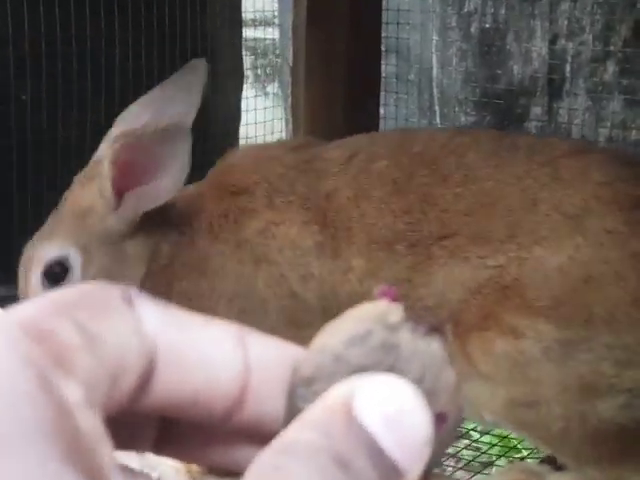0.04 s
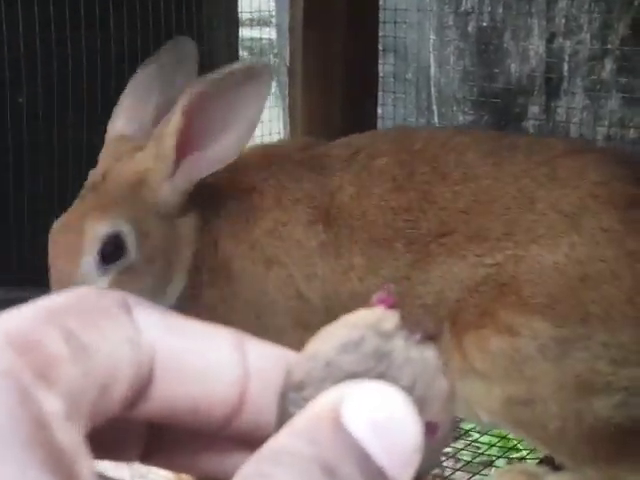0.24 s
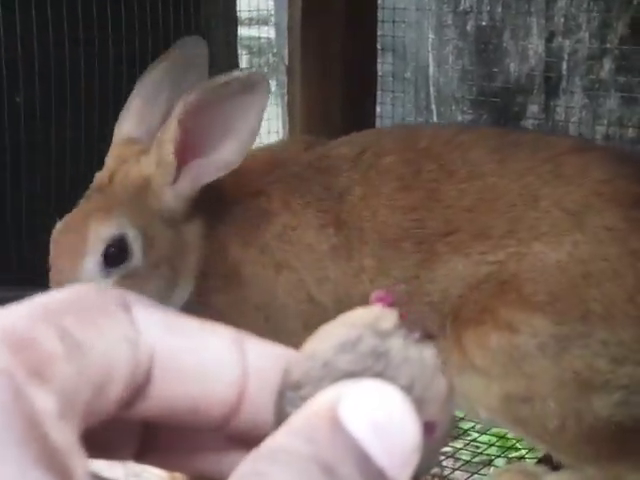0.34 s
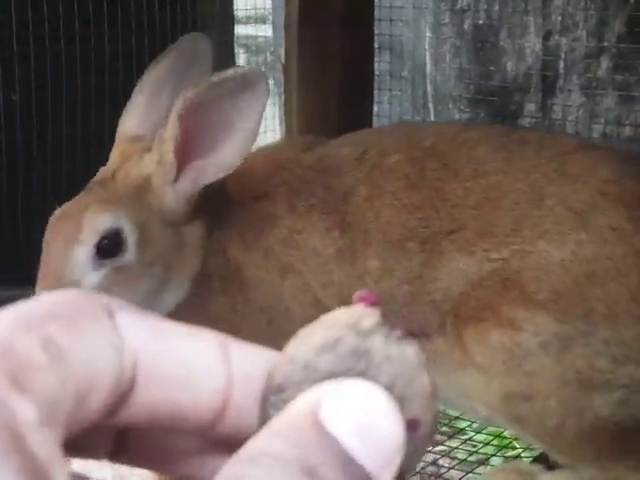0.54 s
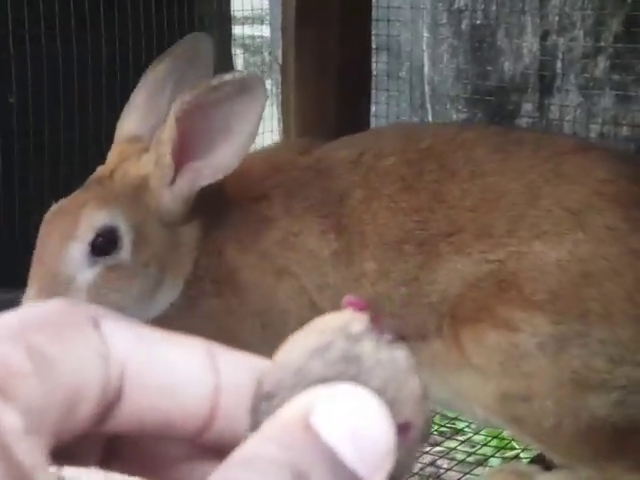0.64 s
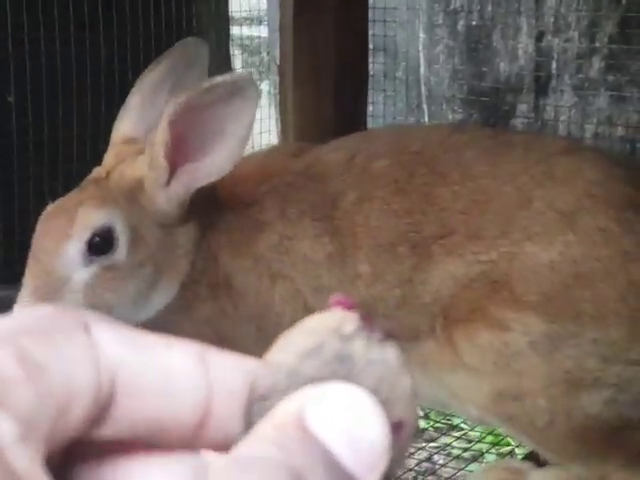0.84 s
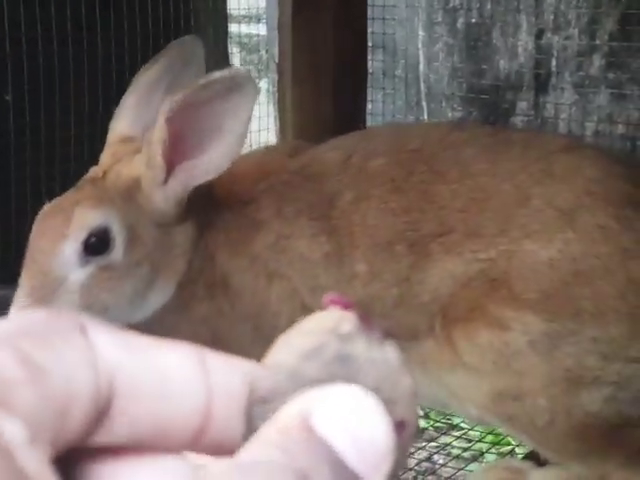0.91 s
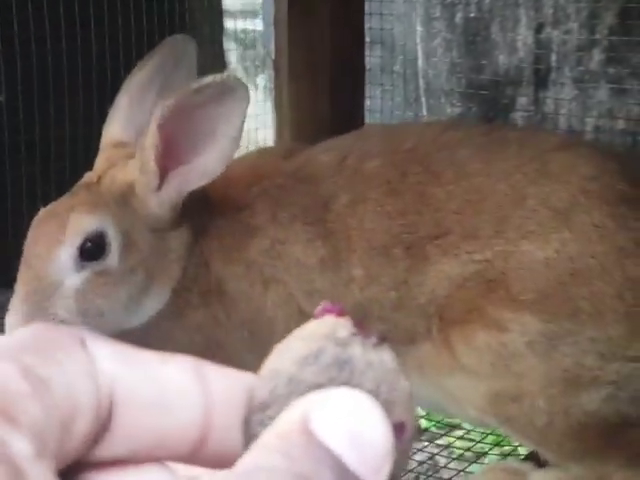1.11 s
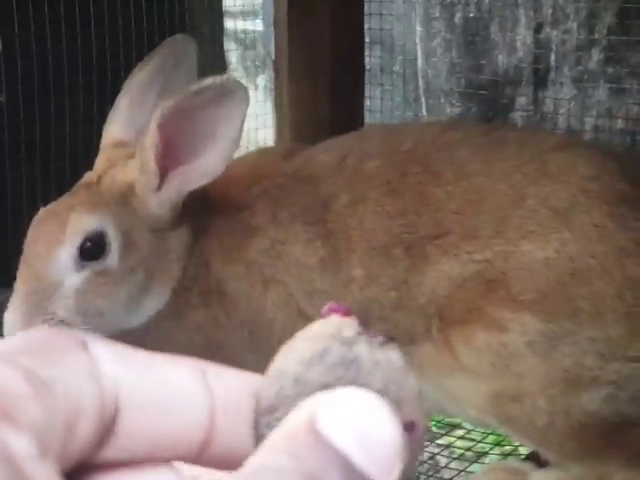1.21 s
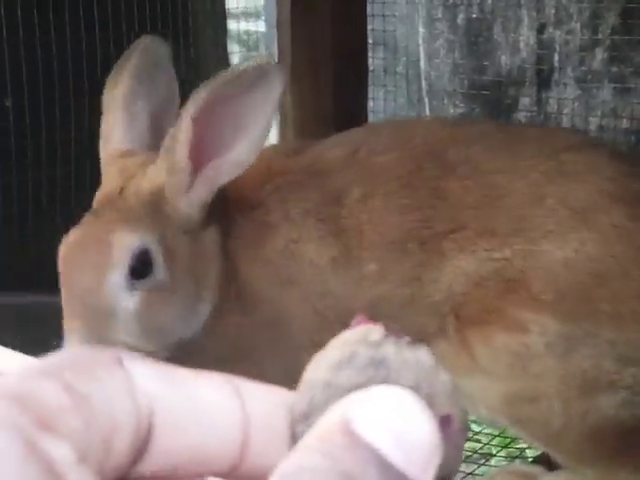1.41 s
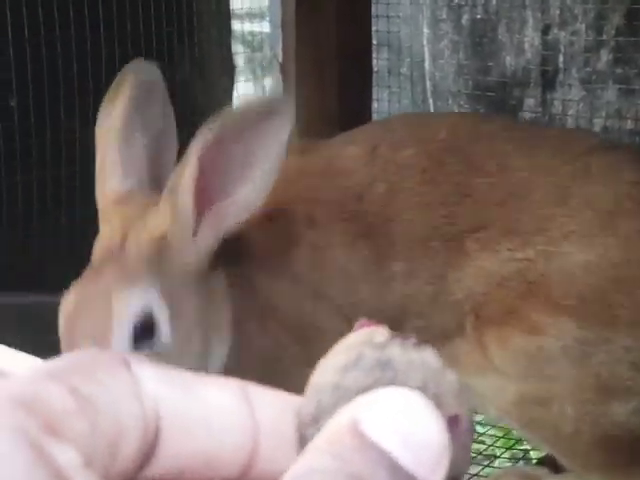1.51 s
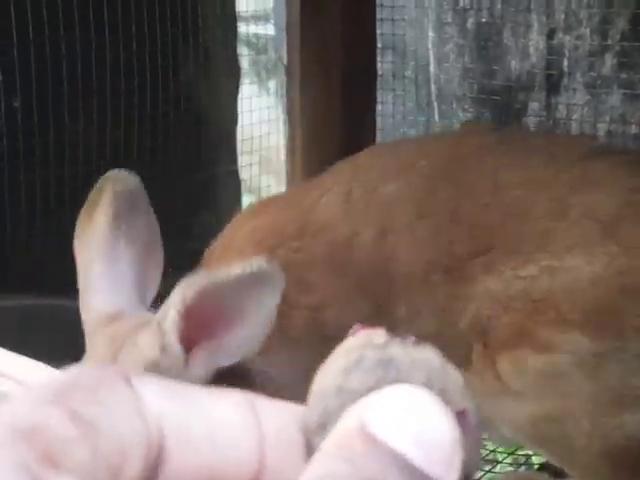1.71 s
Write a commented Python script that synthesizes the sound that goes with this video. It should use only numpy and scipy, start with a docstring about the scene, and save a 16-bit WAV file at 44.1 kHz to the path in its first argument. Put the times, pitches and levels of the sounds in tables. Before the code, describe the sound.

Close to the microphone, a person makes seven quick, squeaky lip kisses, as if calling a rabbit. Each slides in pitch, some rasp, and a faint one trails after. A quiet outdoor rumble and hum lie behind.

```python
"""At a wooden hutch outdoors, close beside a rabbit: seven short, wet, kiss-like squeaks and two faint ones.
Each is a pulse train: a moist opening flutters, and its tiny pops excite one set of resonances.
Slow pops are heard as ticks, fast ones as a tone that glides with the pop rate, turns raspy when
squeezed and dulls as it ends. A brief thin tone rings in each faint squeak, and a faint high pip follows.
The boards reflect the sound, and behind it lie a low rumble, a faint hum and a soft wash of noise."""
import sys
import numpy as np
from scipy import signal
from scipy.fft import rfft, irfft, next_fast_len
from scipy.io import wavfile
from scipy.ndimage import map_coordinates

SR = 44100
rng = np.random.default_rng(int(sys.argv[2]) if len(sys.argv) > 2 else 0)


def dump(signal):
    """Clip the signal to [-1, 1] and save it as 16-bit WAV at the path in sys.argv[1]."""
    limited = np.clip(np.atleast_2d(signal).T, -1, 1)
    pcm = np.round(limited * 32767).astype(np.int16)
    wavfile.write(sys.argv[1], SR, pcm)


N = 77175
TOP_HZ = 16300

# Course of the flutter in each loud squeak: time_s, pop_rate_hz, roughness (0-1), tone_db, sizzle_db
SQUEAK_1 = [(0.2355, 915, 0.1, -37, -43), (0.24, 1008, 0.2, -30.5, -29.5), (0.249, 1171, 0.01, -34.5, -35),
            (0.254, 1191, 0.4, -30.5, -27.5), (0.259, 1439, 0.8, -27, -29),
            (0.266, 1325, 0.97, -30.5, -26.5), (0.274, 1172, 0.57, -30, -30.5),
            (0.282, 1178, 0.8, -34.5, -24), (0.29, 1008, 0.7, -28, -31.5), (0.308, 912, 0.85, -36, -35),
            (0.318, 1010, 0.68, -35, -38.5), (0.335, 950, 0.8, -56, -51)]
SQUEAK_2 = [(0.4653, 369, 0.083, -43.5, -29), (0.469, 456.5, 0.14, -44.5, -24.5),
            (0.48, 604, 0.33, -36, -29.5), (0.492, 715, 0.13, -34.5, -32), (0.504, 861, 0.11, -37, -43),
            (0.514, 799, 0.1, -45.5, -45.5), (0.522, 770, 0.1, -38, -50.5),
            (0.534, 774, 0.057, -40.5, -54.5), (0.547, 810, 0.3, -42, -48.5),
            (0.561, 931, 0.47, -45, -52.5), (0.575, 950.0, 0.51, -52, -47.5)]
SQUEAK_3 = [(0.643, 595, 0.05, -62.5, -80), (0.66, 698.9, 0.05, -45.5, -63),
            (0.68, 896, 0.05, -43.5, -45.5), (0.692, 950, 0.3, -39, -39), (0.694, 729.5, 0.42, -37, -33.5),
            (0.709, 779, 0.15, -38, -28.5), (0.72, 846, 0.4, -38.5, -23), (0.731, 957, 0.3, -30, -28.5),
            (0.735, 1194, 0.1, -31.5, -26.5), (0.743, 1165, 0.15, -30.5, -30),
            (0.76, 963, 0.22, -32.5, -41.5), (0.776, 791, 0.24, -42.5, -52), (0.794, 666, 0.4, -54, -79)]
SQUEAK_4 = [(0.891, 276, 0.16, -41, -30), (0.901, 416, 0.18, -37, -29.5), (0.908, 527, 0.41, -34.5, -35),
            (0.913, 719, 0.82, -36.5, -28), (0.923, 624.3, 0.17, -34.5, -32),
            (0.928, 601, 0.05, -32.5, -32), (0.933, 616, 0.14, -34, -34), (0.94, 786, 0.2, -40, -47),
            (0.946, 734, 0.18, -35, -59), (0.957, 615, 0.2, -54.5, -61)]
SQUEAK_5 = [(1.0837, 345, 0.1, -40, -28.5), (1.09, 518, 0.61, -35, -31.5), (1.096, 693, 0.24, -38, -35),
            (1.101, 681, 0.075, -31.5, -29), (1.111, 774, 0.2, -35, -36.5), (1.119, 760, 0.12, -39.5, -49),
            (1.128, 678, 0.1, -34.5, -49), (1.138, 524, 0.26, -53, -55.5)]
SQUEAK_6 = [(1.2642, 518.3, 0.1, -34.5, -28.5), (1.2668, 700, .2, -40.5, -36),
            (1.269, 1372, .08, -34.5, -33), (1.274, 1159, .08, -35, -43), (1.278, 852, 0.54, -31.5, -35),
            (1.292, 847, 0.25, -33.5, -34), (1.305, 764, 0.044, -33.5, -44), (1.316, 700, .07, -34, -45.5),
            (1.331, 608, 0.078, -39.5, -58), (1.339, 580, 0.1, -53, -69.5)]
SQUEAK_7 = [(1.4572, 796, 0.15, -39, -32.5), (1.462, 1272, 0.1, -34, -38), (1.468, 1202, .05, -33, -41),
            (1.478, 970, 0.32, -31, -34.5), (1.488, 938.4, 0.061, -28, -34),
            (1.508, 866, 0.108, -32.5, -34), (1.521, 781, 0.103, -37, -41),
            (1.534, 746.5, 0.05, -35, -49.5), (1.549, 729.4, 0.05, -42.5, -61), (1.564, 733, .05, -62, -70)]
LOUD_SQUEAKS = (SQUEAK_1, SQUEAK_2, SQUEAK_3, SQUEAK_4, SQUEAK_5, SQUEAK_6, SQUEAK_7)


def amp(db):
    """Decibels as an amplitude ratio."""
    return 10 ** (np.asarray(db) / 20)


def along(points, hz):
    """Interpolation of (frequency_hz, value) points on a logarithmic frequency axis."""
    knots_hz, values = np.transpose(points)
    return np.interp(np.log(hz + 1), np.log(knots_hz + 1), values)


def wobble(knots_per_s):
    """Slow random modulation: a spline through Gaussian knots."""
    knots = rng.standard_normal(int(N * knots_per_s / SR) + 4)
    return map_coordinates(knots, [np.arange(N) * knots_per_s / SR])


def below(hz, edge_hz, order=12):
    """Low-pass gain, one half at the edge."""
    return 1 / (1 + (hz / edge_hz) ** order)


def filtered(x, response):
    """Linear filtering: the spectrum is multiplied by a frequency response."""
    size = next_fast_len(N + SR // 2)
    return irfft(rfft(x, size) * response(np.fft.rfftfreq(size, 1 / SR)), size)[..., :N]


def impulses(times, sizes, half_width=8):
    """Band-limited impulses, placed between samples by a windowed sinc."""
    at = times[:, None] * SR
    index = at.astype(int) + np.arange(1 - half_width, half_width + 1)
    shape = np.sinc(index - at) * np.cos(np.pi * (index - at) / (2 * half_width)) ** 2
    return np.bincount(np.clip(index, 0, N).ravel(), (shape * sizes[:, None]).ravel(), N + 1)[:N]


def squeaks(puff_s=0.00032, hiss_db=-18.5, release_db=-8.5, muffle_db=-28):
    """Source and filter: each pop and its puff of turbulent air excite the same resonances."""
    # Two faint squeaks: time_s, pop_rate_hz, roughness (0-1), tone_db, sizzle_db
    faint_late = [(1.657, 572, 0.125, -60, -50), (1.666, 595, 0.17, -50.5, -46),
                  (1.682, 620, 0.82, -58, -53)]
    faint_early = [(.367, 824, .8, -66, -67), (.374, 780, 0.95, -58, -39), (.384, 807, .8, -62, -50)]
    # Lone pops ahead of a squeak: start_s, tone_db, sizzle_db
    lone_pops = [(0.63, -29.5, -38.5), (0.8736, -24, -25), (0.883, -20, -14.5)]
    lone = [(start_s, 0, 0, tone, sizzle) for start_s, tone, sizzle in lone_pops]
    loud = np.vstack([flutter(squeak) for squeak in LOUD_SQUEAKS] + [lone])
    pops = np.vstack([loud, flutter(faint_late), flutter(faint_early)])
    times, rough, closing, tone_db, sizzle_db = pops.T
    faint = np.arange(len(times)) >= len(loud)
    bright_db = sizzle_db - tone_db
    levels_db = [tone_db - 8.5 - 0.42 * np.maximum(bright_db, 0),  # low: thinner in a bright pop
                 tone_db - 3.5,  # tone
                 tone_db - 3.5 + release_db * closing * ~faint,  # upper tone: fades first on closing
                 tone_db - 6.5 + 0.628 * bright_db,  # middle: partly follows the sizzle
                 sizzle_db - 3.5 + muffle_db * faint]  # sizzle
    size = next_fast_len(N + SR // 10)
    hz = np.fft.rfftfreq(size, 1 / SR)
    low_passes = [below(hz, edge_hz) for edge_hz in (1055, 1956, 3170, 6120)]
    bands = np.diff(low_passes, axis=0, prepend=0, append=1)
    colour = resonances(size)
    puff = np.exp(-np.arange(128) / SR / puff_s)
    puff /= np.linalg.norm(puff)
    spectrum = 0
    for db, band in zip(levels_db, bands):
        air_envelope = np.convolve(impulses(times, amp(db + hiss_db + 3 * rough)), puff)[:N]
        drive = impulses(times, amp(db)) + air_envelope * rng.standard_normal((2, N))
        band_rms = np.sqrt(np.mean(np.abs(colour.mean(0) * band) ** 2))
        spectrum = spectrum + rfft(drive, size) * colour * band / band_rms
    return -irfft(spectrum, size)[:, :N]  # polarity inverted; the pops sound the same


def flutter(squeak, waver=0.008, jitter_periods=0.11, limp_periods=0.16, release_s=0.032):
    """Pulse train: one pop a cycle; jitter and period doubling or tripling make it rasp."""
    knots_s, *controls = np.transpose(squeak)
    t = np.arange(knots_s[0], knots_s[-1], 1 / SR)
    pitch_hz = np.interp(t, knots_s, controls[0]) * (1 + waver * wobble(160)[:len(t)])
    cycles = np.cumsum(pitch_hz) / SR
    times = np.interp(np.arange(cycles[-1]), cycles, t)
    rate_hz, rough, tone_db, sizzle_db = [np.interp(times, knots_s, column) for column in controls]
    jitter, shimmer, sparkle, grouping = rng.standard_normal((4, len(times)))
    # In rough flutter every second or third pop comes late and slightly weaker.
    late = np.isin(np.arange(len(times)), np.cumsum(np.where(grouping > 1, 2, 3)))
    limp = late - late.mean()
    pop_db = 10 * np.log10(SR / rate_hz)  # keeps the power independent of the pop rate
    pop_db += rough * (0.5 * shimmer - limp)
    pop_db[0] += 0.5  # the first pop breaks the seal
    times = times + (jitter_periods * rough ** 1.65 * jitter + limp_periods * rough * limp) / rate_hz
    closing = np.clip(1 - (knots_s[-1] - times) / release_s, 0, 1)
    scatter_db = 4.75 * rough * (sparkle - rough)
    return np.transpose([times, rough, closing, tone_db + pop_db, sizzle_db + pop_db + scatter_db])


def resonances(size, smear_s=0.00092, smear_from_hz=5900):
    """Stereo transfer function of a pop, with dispersion: its top arrives later than its low end."""
    # Resonance peaks and dips of every pop: frequency_hz, left_db, right_db
    pop_colour = [(300, -43.5, -44.5), (441, -9.5, -11), (700, -8.5, -12.5), (950, -6, -8.5),
                  (1313, 2, -1.5), (1944, -3.5, -1), (2337, 0, 5), (2824, -7, 1.5), (3450, -3.5, -11.5),
                  (4200, -6, -3.5), (4700, -0.5, -12), (4900, -9, -16.5), (6040, -3, -5),
                  (7680, -11.5, -22), (8230, -31.5, -26.5), (9303, -12, -26), (10270, -6, -10.5),
                  (11740, -14.5, -14.5), (13700, 0.5, -8.5), (14200, -7, -21), (15800, -2.5, -22),
                  (16330, -24.5, -43.5)]
    rings = np.array([minimum_phase(np.array(pop_colour)[:, [0, side]]) for side in (1, 2)])
    hz = np.fft.rfftfreq(size, 1 / SR)
    phase_lag = np.pi * smear_s * np.maximum(hz - smear_from_hz, 0) ** 2 / TOP_HZ
    return rfft(rings, size) * np.exp(-1j * phase_lag)


def minimum_phase(points, size=1024):
    """Folding the cepstrum gives the shortest ring with a given (frequency_hz, level_db) spectrum."""
    cepstrum = irfft(np.log(amp(along(points, np.fft.rfftfreq(size, 1 / SR)))))
    cepstrum[1:size // 2] *= 2
    cepstrum[size // 2 + 1:] = 0
    return irfft(np.exp(rfft(cepstrum)))


def thin_tones(waver_rad=0.35):
    """Gaussian tone bursts: two ring within the faint squeaks, and one faint high pip follows."""
    # Brief tones: centre_s, half_width_s, pitch_hz, level_db
    bursts = [(.374, 0.0043, 4868, -53), (1.663, 0.0069, 1701, -43), (1.745, 0.0053, 5040, -60)]
    t = np.arange(N) / SR
    sound = 0
    for centre_s, half_width_s, pitch_hz, level_db in bursts:
        envelope = amp(level_db) * np.exp(-((t - centre_s) / half_width_s) ** 2)
        sound = sound + envelope * np.sin(2 * np.pi * pitch_hz * t + waver_rad * wobble(300))
    return sound


def early_reflections(direct, edge_hz=3900, t60_s=0.029):
    """Scattering: a hand and the near boards return the treble, in a new pattern for each loud squeak."""
    treble = filtered(direct, lambda hz: 1 - below(hz, edge_hz, order=4))
    changes_s = [squeak[0][0] - 0.03 for squeak in LOUD_SQUEAKS[1:]]
    segment = np.searchsorted(changes_s, np.arange(N) / SR)
    return sum(diffuse(treble * (segment == k), [(1000, t60_s)], delay_s=0.0002)
               for k in np.unique(segment))


def hutch_reverberation(direct):
    """Reverberation: repeated reflections in the hutch linger longest in the bass."""
    # Time to decay by 60 dB: frequency_hz, t60_s
    decay_times = [(300, 0.3), (2000, 0.11), (6000, 0.176), (9000, 0.16), (14000, 0.1574)]
    return diffuse(direct, decay_times, delay_s=0.0057)


def diffuse(x, decay_times, delay_s):
    """Diffuse field: convolution with stereo noise in which each frequency decays exponentially."""
    hz, t, noise = signal.stft(rng.standard_normal((2, SR // 3)), SR, nperseg=64)
    decay = amp(-60 * t / along(decay_times, hz)[:, None])
    tail = signal.istft(noise * decay, SR, nperseg=64)[1]
    response = np.pad(tail / np.linalg.norm(tail[0]), ((0, 0), (int(delay_s * SR), 0)))
    return signal.fftconvolve(x, response, axes=1)[:, :N]


def outdoor_noise(spectrum):
    """Partial coherence: noise of unit rms, nearly alike in both channels at long wavelengths."""
    # Likeness of left and right: frequency_hz, correlation
    coherence = [(60, 0.998), (300, 0.95), (1500, 0.3), (5000, 0.56), (14000, .3)]

    def mid_side_gains(hz):
        angle = np.arccos(along(coherence, hz)) / 2
        return amp(along(spectrum, hz)) * [np.cos(angle), np.sin(angle)]

    mid, side = filtered(rng.standard_normal((2, N)), mid_side_gains)
    stereo = np.array([mid + side, mid - side])
    return stereo / np.sqrt(np.mean(stereo ** 2))


def background(hum_hz=135.75, drift_rad=0.89, waver_db=2.1, left_lead_db=4.5):
    """Ambient noise: outdoor rumble, a phase-modulated hum and an amplitude-modulated wash."""
    # Spectral densities of the rumble and the wash: frequency_hz, relative_db
    rumble_spectrum = [(20, -31), (35, -8.5), (46, -14.5), (62, 0), (80, -3), (100, -6.5), (116, -17),
                       (138, -8), (170, -9.5), (220, -23), (300, -17), (500, -59.5)]
    wash_spectrum = [(450, -7.5), (800, -10.5), (1500, -9.5), (2500, -13), (4000, -25.5), (7000, -26.5),
                     (8500, -37.5), (15000, -34)]
    rumble = filtered(outdoor_noise(rumble_spectrum), lambda hz: below(hz, edge_hz=520))
    hum = np.sqrt(2) * np.sin(2 * np.pi * hum_hz * np.arange(N) / SR + drift_rad * wobble(8))
    wash = amp(waver_db * wobble(15.22)) * outdoor_noise(wash_spectrum)
    balance = amp([[left_lead_db / 2], [-left_lead_db / 2]])
    return (amp(-47.5) * rumble + amp(-57) * hum + amp(-54.5) * wash) * balance


def scene():
    """Superposition of the direct sound, its reflections and the outdoor background."""
    direct = squeaks() + thin_tones()
    reflected = amp(2) * early_reflections(direct) + amp(-12) * hutch_reverberation(direct)
    return direct + reflected + background()


def record(dry):
    """Band limiting: a very steep low-pass removes the highest treble."""
    return filtered(dry, lambda hz: below(hz, TOP_HZ, order=120))


dry = scene()
out = record(dry)
dump(out)
```